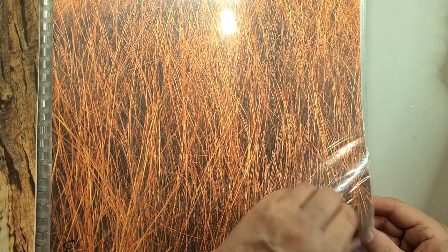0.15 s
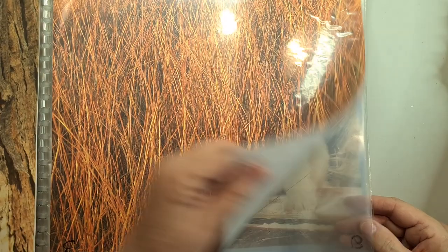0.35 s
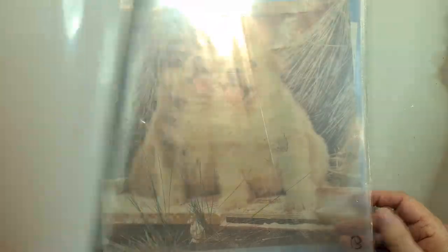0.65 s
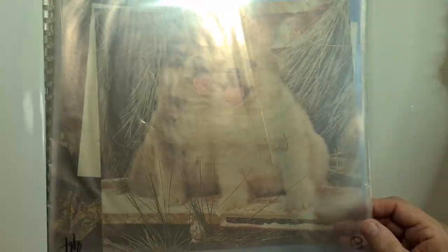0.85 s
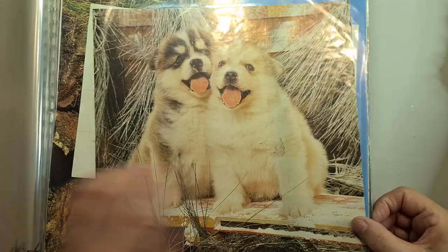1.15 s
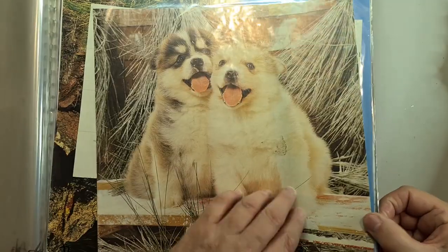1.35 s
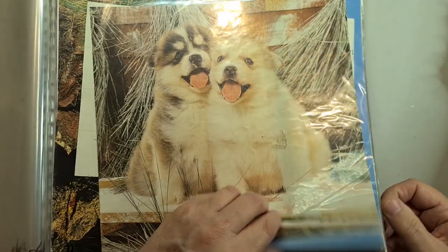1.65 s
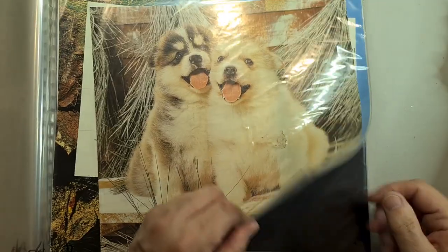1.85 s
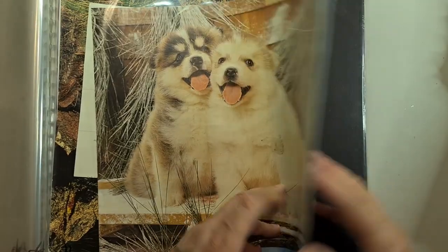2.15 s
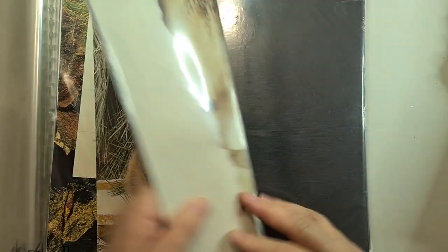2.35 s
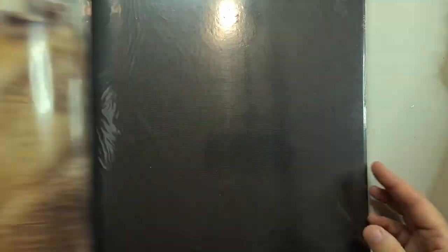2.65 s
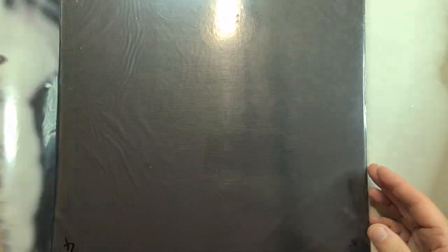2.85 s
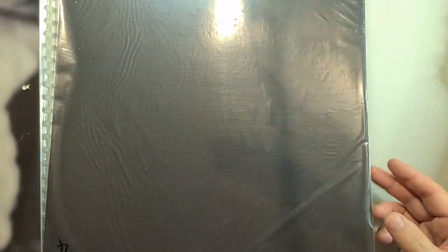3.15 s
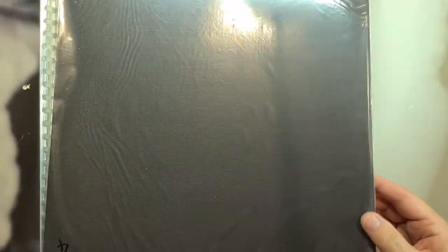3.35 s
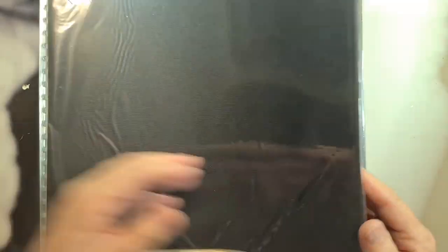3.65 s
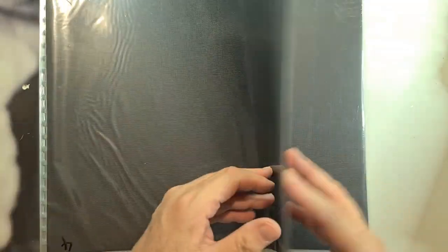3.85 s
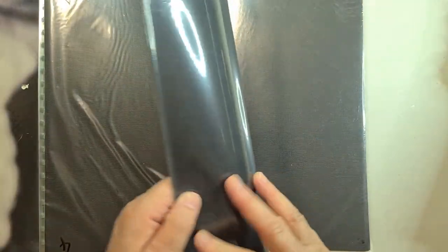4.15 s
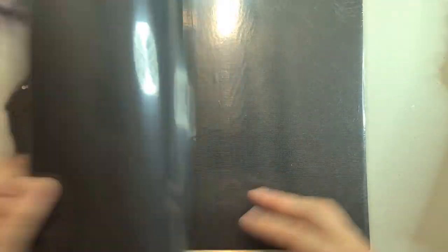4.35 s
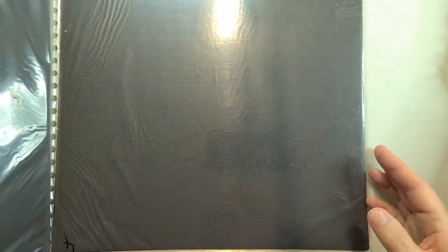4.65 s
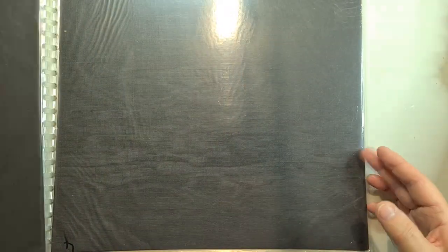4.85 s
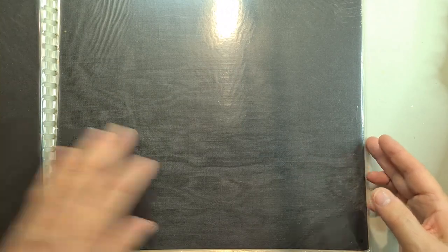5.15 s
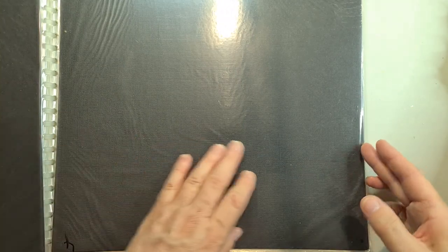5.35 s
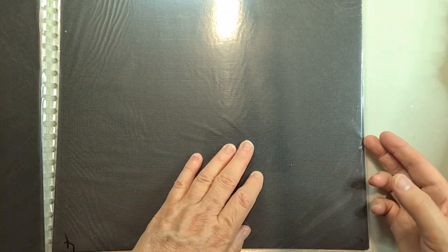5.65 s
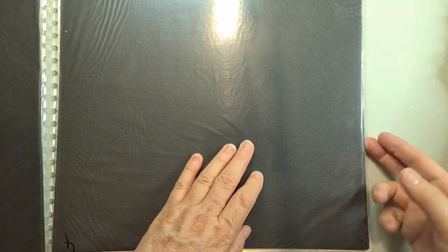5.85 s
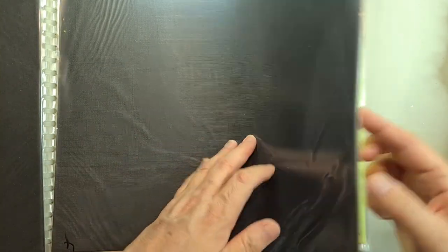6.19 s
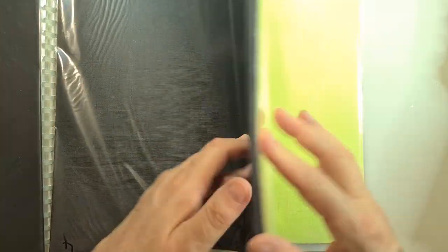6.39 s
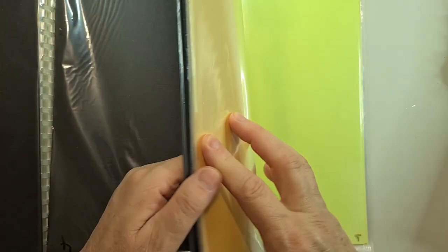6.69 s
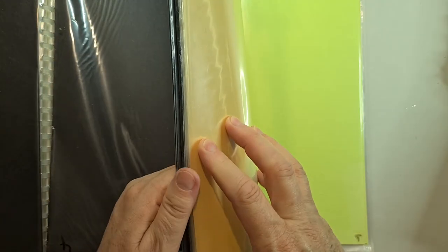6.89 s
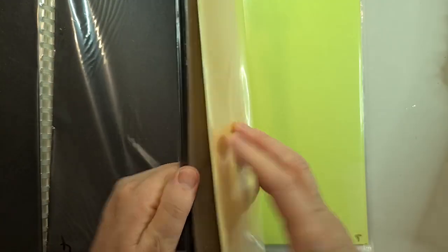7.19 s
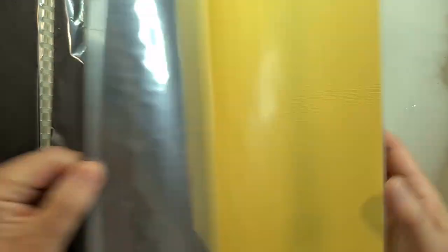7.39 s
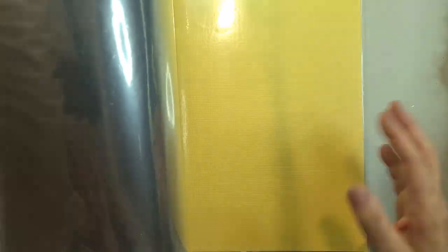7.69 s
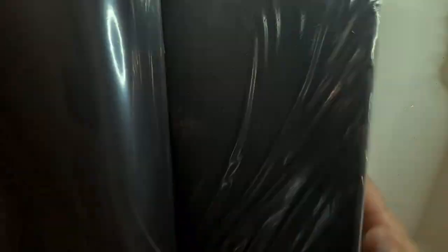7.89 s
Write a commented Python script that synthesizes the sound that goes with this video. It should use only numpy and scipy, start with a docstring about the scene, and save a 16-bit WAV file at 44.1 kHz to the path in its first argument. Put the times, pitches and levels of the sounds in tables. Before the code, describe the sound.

Large plastic sleeve pages crinkle, snap and pop as hands turn them close up, over a low appliance hum, ending in a hard booming slap.

```python
"""A small room with an appliance humming; a table, close under a stereo phone microphone.
Hands leaf through a big folder of plastic sleeves: bending film rustles in showers of tiny noise bursts
and cracks in short pitched ticks; stiffer sheets pop as pulses with ringing modes.
Pages thump down as damped low swings, fingers rub a sleeve as resonant hiss,
and late on the lifted stack slaps taut with a gliding boom. A short diffuse tail follows the hands."""
import sys
import numpy as np
from scipy import signal
from scipy.fft import rfft, irfft, next_fast_len
from scipy.io import wavfile
from scipy.ndimage import uniform_filter1d

SR = 44100
rng = np.random.default_rng(int(sys.argv[2]) if len(sys.argv) > 2 else 0)


def int16_out(signal):
    """Quantize to a 16-bit WAV file."""
    q = np.round(np.clip(np.atleast_2d(signal).T, -1, 1) * 32767)
    wavfile.write(sys.argv[1], SR, q.astype(np.int16))


N = 353946
SIDES = np.array([[.5], [-.5]])  # left and right microphone port: shares of a left-minus-right value


def undb(db):
    """Amplitude factor of a level in dB."""
    return 10 ** (np.asarray(db) / 20)


def level(x, db):
    """Bring a sound to an RMS level, which may vary with time."""
    return x * undb(db) / np.sqrt(np.mean(x ** 2))


def colour(x, points):
    """Shape a spectrum by (pitch_hz, level_db) points, joined along log frequency."""
    hz, db = np.transpose(points)
    size = next_fast_len(x.shape[-1])
    f = np.arange(size // 2 + 1) * SR / size + 1
    gain = undb(np.interp(np.log(f), np.log(hz), db))
    return irfft(rfft(x, size) * gain, size)[..., :x.shape[-1]]


def band(x, hz, width):
    """Two-pole resonance, gain 1 at the centre."""
    b, a = signal.iirpeak(min(hz, SR * .45), hz / min(width, SR / 4), SR)
    return signal.lfilter(b, a, x)


def pair(size, alike):
    """Noise for both ports; alike 0-1 is their correlation."""
    mid, side = rng.standard_normal((2, size))
    alike = np.clip(alike, 0, 1)
    return np.sqrt((1 + alike) / 2) * mid + np.sqrt((1 - alike) / 2) * side * np.sign(SIDES)


def fade(t60, size):
    """Exponential decay by 60 dB in t60 seconds, never quicker than 2 ms."""
    return np.exp(-np.log(1000) * np.arange(size) / SR / max(t60, .002))


def walk(rate):
    """Random wander: a new value every 1 / rate s, slewed between; spread about 0.8."""
    k = int(SR / rate)
    held = np.repeat(rng.standard_normal(N // k + 1), k)
    return uniform_filter1d(held, k)[:N]


def curve(table):
    """Columns of a table, after its times, as values at every sample."""
    s, *columns = np.transpose(table)
    return [np.interp(np.arange(N) / SR, s, c) for c in columns]


def add(out, s, x, peak_db, pan_db):
    """Lay a short sound at time s, its port average peaking at peak_db, leaned left by pan_db."""
    i = int(s * SR)
    x = x[:, :N - i] / np.abs(x.mean(axis=0)).max()
    out[:, i:i + x.shape[1]] += x * undb(peak_db + pan_db * SIDES)


# appliance hum lines: pitch_hz, width_hz (of each of two filter passes), level_db
HUM_LINES = [(50.4, 7.2, -64), (102.9, 12.8, -58.5), (150.1, 9.2, -59.5), (204.7, 19.4, -54),
             (232, 19.7, -54.5), (297.9, 16.6, -66), (343.4, 25, -76)]
# spectrum of rumble and hiss behind the hum: pitch_hz, level_db (per Hz, relative)
AIR_SPECTRUM = [(15, -39), (25, -21), (53, -2.5), (149, -5.5), (206, -6), (293, -10), (344, -16.5),
                (575, -32.5), (887, -27.5), (2220, -48.5), (7310, -58), (12900, -50), (16000, -61)]
AIR_DB = -53.5


def hum():
    """Noisy motor lines over rumble, and faint unrelated hiss at each port."""
    drone = pair(N, 0.99)
    lines = 0
    for hz, width, db in HUM_LINES:
        line = band(band(drone, hz, width), hz, width)
        lines = lines + level(line, db + 1.83 * walk(1.584))
    low = signal.butter(2, 450., fs=SR, output="sos")
    near, apart = pair(N, 0.98), pair(N, 0)
    # the ports nearly agree at low pitch and differ above
    air = signal.sosfilt(low, near - apart) + apart
    return lines + level(colour(air, AIR_SPECTRUM), AIR_DB)


def grains(rate, spread_db, t60, hiss_db, alike):
    """Tiny creases at random moments (rate per second), each a short burst, over sliding hiss."""
    strength_db = spread_db * np.minimum(rng.exponential(size=N), 4)
    hit = (rng.random(N) < rate / SR) * undb(strength_db)
    power = signal.fftconvolve(hit ** 2, fade(t60, 2048) ** 2)[:N]
    shape = np.sqrt(power.clip(0))
    return (level(shape, 0) + undb(hiss_db)) * pair(N, alike)


def creases(centres_hz, rate, t60, alike):
    """Each size of crease snaps at its own moments and rings its own band."""
    total = 0
    for hz in centres_hz:
        snaps = grains(rate, spread_db=4.5, t60=t60, hiss_db=-2.5, alike=alike)
        total = total + band(snaps, hz, 0.64 * hz) / np.sqrt(hz)
    return total


# hands stirring the film, level of the fine rustle: start_s, level_db
STIRRING = [(0.0, -73), (0.67, -75.5), (1.34, -80), (2.01, -67), (2.68, -68.5), (3.35, -70.5), (4.01, -73),
            (4.68, -61), (5.35, -99.0), (6.02, -74.5), (6.95, -86), (7.36, -72), (8.03, -61.5)]
STIR_CRINKLE_DB, STIR_FLAP_DB = -0.5, -3  # lower layers against the finest
# tugs at a page: start_s (full level reached), held_s, fine_db, crinkle_db, flap_db
PAGE_TUGS = [(0.068, 0.085, -64, -62, -70), (0.199, 0.066, -64.5, -63.5, -70.5),
             (0.376, 0.011, -73, -53.5, -55.5), (0.493, 0.067, -68, -60.5, -67.5),
             (0.598, 0.041, -65.5, -61.5, -64), (0.713, 0.025, -80, -65, -65.5),
             (0.827, 0.089, -60.5, -61, -61), (0.966, 0.0092, -61.5, -58, -67),
             (1.129, 0.0065, -62, -59.5, -68), (1.356, 0.098, -78, -71, -73), (1.465, 0.158, -90, -81, -67),
             (1.628, 0.0045, -54, -49, -55.5), (1.688, 0.006, -58, -56, -63), (1.78, 0.046, -70, -65, -65),
             (1.943, 0.086, -61, -59.5, -58), (2.088, 0.063, -61, -59.5, -68),
             (2.193, 0.079, -61, -64, -62.5), (2.328, 0.035, -58.5, -66.5, -85.0),
             (2.437, 0.018, -59, -60, -66), (2.602, 0.016, -56, -67.5, -71),
             (2.668, 0.023, -64, -64, -57.5), (2.79, 0.037, -68.5, -76, -56),
             (2.906, 0.043, -50, -52.0, -53.5), (3.26, 0.04, -54, -59, -79), (3.445, 0.034, -66, -71, -76),
             (3.596, 0.044, -58.5, -59, -63.5), (3.742, 0.015, -63, -53, -56),
             (3.828, 0.066, -58.5, -58.5, -67), (3.944, 0.096, -61, -63, -62.5),
             (4.123, 0.14, -65.5, -62.5, -67), (4.27, 0.11, -53.5, -52.5, -54.5),
             (4.404, 0.07, -59, -57.5, -51), (4.588, 0.067, -50, -51, -51.5),
             (4.717, 0.049, -55.5, -62, -60.5), (4.797, 0.048, -54, -57, -60.5),
             (4.958, 0.0065, -53.5, -61, -65), (5.04, 0.01, -65, -71, -78), (5.185, 0.12, -65, -71, -65),
             (5.351, 0.0082, -51.5, -59.5, -53), (5.466, 0.006, -58, -58, -64),
             (5.686, 0.006, -63, -61.5, -69), (6.02, 0.036, -50.5, -46.5, -44),
             (6.093, 0.007, -51.5, -50, -46), (6.184, 0.044, -52.5, -50.5, -52.5),
             (6.291, 0.006, -52.5, -52.5, -57), (6.44, 0.06, -55, -65, -72),
             (6.555, 0.085, -64.5, -66, -70.5), (6.716, 0.023, -65, -68.5, -73),
             (7.012, 0.017, -66, -78.5, -78), (7.142, 0.049, -60.5, -60.5, -63.5),
             (7.243, 0.025, -52.5, -52.5, -57.5), (7.36, 0.058, -53.5, -53, -59),
             (7.48, 0.017, -59, -58.0, -65), (7.685, 0.076, -57.5, -55.5, -62),
             (7.813, 0.023, -43.5, -41.5, -34)]
RISE_DB_PER_S, FALL_DB_PER_S = 798, 314


def tugs():
    """Levels of fine rustle, crinkle and flap: faint stirring plus bursts that swell fast, hold and die."""
    t = np.arange(0, N + 64, 64) / SR
    s, held_s, *peaks_db = np.transpose(PAGE_TUGS)[:, :, None]
    swell_db = RISE_DB_PER_S * np.minimum(t - s, 0)
    shape_db = swell_db - FALL_DB_PER_S * np.maximum(t - s - held_s, 0)
    stir_db = np.interp(t, *np.transpose(STIRRING))
    levels = []
    for peak_db, layer_db in zip(peaks_db, (0, STIR_CRINKLE_DB, STIR_FLAP_DB)):
        power = (undb(shape_db + peak_db) ** 2).sum(axis=0) + undb(stir_db + layer_db) ** 2
        levels.append(np.interp(np.arange(N) / SR, t, 10 * np.log10(power)))
    return levels


# spectrum of thin film: pitch_hz, level_db (per Hz, relative)
FILM_SPECTRUM = [(880, -12.5), (1500, -2), (2100, -2.5), (2590, -1), (3520, -3.5), (6830, -4), (7320, -7.5),
                 (7920, -1.5), (12000, -4), (15100, -5), (16000, -43)]
# spectrum of a whole sheet: pitch_hz, level_db (per Hz, relative)
SHEET_SPECTRUM = [(210, -30), (350, -4), (487, -3), (632, -2), (853, -5), (1280, -10), (1600, -20),
                  (2080, -23), (3520, -120)]
# where the hands work, between the ports: start_s, left_minus_right_db
HAND_PLACES = [(0.0, -2), (0.74, 3.5), (1.65, 1), (3.55, 3.5), (3.98, 0.5), (4.54, 2), (5.16, 0.5),
               (6.62, 0.5), (6.71, 1), (8.03, 2)]


def rustle():
    """Small creases sound high, larger ones lower, whole sheets flap lowest; some snaps reach all bands."""
    fine_db, crinkle_db, flap_db = tugs()
    broad = grains(rate=160.0, spread_db=2.5, t60=0.0062, hiss_db=-1.0, alike=0.051)
    small = level(creases((5900, 8900, 12800, 15100), rate=65.0, t60=0.0096, alike=0.047), 0)
    middle = level(creases((1680, 2560, 3820, 5060), rate=45., t60=0.013, alike=0.12), 0)
    large = level(creases((450, 700, 1100), rate=30., t60=0.022, alike=0.85), 0)
    # fine rustle lies above the split, crinkle below it
    split = signal.butter(3, 5200., fs=SR, output="sos")
    fine = colour(small + 0.52 * broad, FILM_SPECTRUM)
    fine = fine - signal.sosfiltfilt(split, fine)
    crinkle = signal.sosfilt(split, colour(middle + 1.33 * broad, FILM_SPECTRUM))
    flap = colour(large + 1.47 * broad, SHEET_SPECTRUM)
    fine = level(fine, fine_db + 2.0 * walk(37))
    crinkle = level(crinkle, crinkle_db + 1.75 * walk(32))
    flap = level(flap, flap_db + 1.86 * walk(13))
    return (fine + crinkle + flap) * undb(curve(HAND_PLACES)[0] * SIDES)


# creases of the film snapping over: start_s, peak_db, pitch_hz, left_minus_right_db
FILM_CRACKS = [(0.068, -46, 8730, -4), (0.372, -29, 2170, 1), (0.483, -49, 5730, 5), (0.5, -41, 4870, 6),
               (0.746, -51.5, 3390, 8), (0.819, -50, 9000, 2), (1.1202, -32, 9400, -2),
               (1.6286, -30, 3770, -3), (1.686, -37.5, 12100, -2), (1.6965, -32, 12300, -2),
               (1.778, -47, 3340, 6), (1.924, -39, 3700, 0), (1.9877, -40, 3460, -0.5),
               (2.0166, -44, 3500, 0.5), (2.047, -45, 3980, 0), (2.0893, -30, 6500, 6),
               (2.0922, -32, 9000, -4), (2.132, -36, 2300, -3), (2.204, -47, 1900, 2),
               (2.252, -39, 11600, 4), (2.332, -42, 11600, 0), (2.43, -46, 4000, 1), (2.6723, -44, 8400, 7),
               (2.918, -38, 9000, 1), (3.39, -49, 9000, 3), (3.4452, -44.5, 8000, -1),
               (3.4817, -43, 8120, 5), (3.593, -39, 3070, 6), (3.617, -43, 3500, 4),
               (3.736, -35.5, 2200, 1.5), (3.7437, -40, 1800, 2), (3.7594, -35, 2200, 2),
               (3.7953, -42, 8030, -0.5), (3.831, -44, 7000, 3), (3.838, -36.5, 3800, 3),
               (3.856, -43.5, 1700, 2), (4.037, -43.5, 2870, 4), (4.127, -47.5, 6600, 6),
               (4.236, -42, 8850, 2.0), (4.2567, -38, 3800, 5), (4.299, -31, 9200, 5),
               (4.346, -33, 8600, 5), (4.3674, -39, 13600, 1.5), (4.4048, -39, 5800, 9),
               (4.414, -39, 8000, 4), (4.505, -44, 4000, 2), (4.58, -27, 4540, 2), (4.6225, -29, 12000, 7),
               (4.809, -44, 7500, -4), (4.8254, -29, 9200, 7), (4.9504, -32, 10400, -3),
               (5.242, -39, 9850, 1), (5.312, -36.5, 9100, -4), (5.3451, -34.5, 11000, 2),
               (5.462, -34, 4460, 0), (5.682, -35.5, 8600, 0), (5.913, -47.5, 2000, -8),
               (6.009, -41, 3780, -9), (6.017, -32, 3980, -2), (6.0473, -24, 2920, -2),
               (6.0895, -31, 2970, -4), (6.098, -41, 2980, -6), (6.103, -33, 8140, -0.5),
               (6.119, -32.5, 5390, -2.5), (6.146, -38, 5100, -3), (6.202, -36, 3440, -3),
               (6.221, -41, 8000, -2), (6.272, -44, 9000, -2), (6.288, -36, 4500, -3),
               (6.2984, -26.5, 4780, -2), (6.613, -39.5, 11800, 3), (6.717, -40, 9050, 4.5),
               (7.019, -37, 8700, 4), (7.131, -32, 8950, 2), (7.16, -36, 5000, 6), (7.2399, -33, 8720, 7),
               (7.259, -39, 7000, 3), (7.303, -37.5, 8610, 0), (7.319, -45, 7000, 4),
               (7.3547, -33.5, 9000, 2), (7.3818, -31, 3100, 4), (7.432, -42, 1600, 2),
               (7.471, -44, 4500, 2), (7.4955, -39, 3030, 0), (7.657, -48, 4500, 3),
               (7.684, -32.5, 9610, 5), (7.6922, -34.5, 8000, 7), (7.712, -38.5, 1500, 3),
               (7.7542, -35, 4880, 7), (7.8035, -18, 2950, 0), (7.827, -21, 9700, 2),
               (7.8415, -28, 8950, -2), (7.9105, -39.5, 8780, 0), (8.013, -46, 4650, 6)]
# resonances of the taut sleeve when snapped or rubbed: pitch_hz, width_hz (per filter pass), level_db
SLEEVE_MODES = [(1710, 390, -0.5), (3700, 700, -7), (5500, 1100, -4.5), (9640, 2700, 0.5)]


def cracks():
    """Each snap is a sharp tick and brief noise at its own pitch; it rings the sleeve, retuned by each bend."""
    out, t = np.zeros((2, N)), np.arange(2048) / SR
    shape = (fade(0.0076, 2048) + 0.19 * fade(0.034, 2048)) * (1 - fade(0.002, 2048))
    for s, db, hz, pan_db in FILM_CRACKS:
        bend, lag = rng.standard_normal(2)
        # the tick reaches the ports slightly apart
        tick = np.sinc(SR * .7 * (t - .0006 + .00008 * lag * SIDES))
        burst = pair(2048, 0.058) * shape + 2.43 * tick
        narrow = band(burst, hz, 0.19 * hz)
        broad = band(colour(burst, FILM_SPECTRUM), hz, 1.7 * hz)
        ring = 0
        for f, width, mode_db in SLEEVE_MODES:
            # modes far from the snap's pitch are driven less
            gain = undb(mode_db - 3. * abs(np.log2(f / hz)))
            ring = ring + gain * band(burst, f * np.exp(0.071 * bend), width)
        add(out, s, narrow + 0.65 * broad + 0.76 * ring, db, pan_db)
    return out


def flick(hz, cycles, t):
    """A few swings under a bell-shaped envelope."""
    return np.exp(-(t * hz / cycles) ** 2) * np.cos(2 * np.pi * hz * t)


# stiff sheets buckling: start_s, peak_db, pitch_hz, left_minus_right_db
SHEET_POPS = [(0.359, -43, 1690, 4), (0.371, -27, 1390, 4), (1.121, -39.5, 2420, -0.5),
              (1.631, -31.5, 1380, 0), (1.922, -36.5, 796, 0), (1.989, -44, 830, -2),
              (2.133, -37.5, 704, 2), (2.205, -44.5, 700, 2), (2.803, -41, 1300, 4.5), (2.802, -30, 510, 6),
              (3.742, -37.5, 650, 2), (4.328, -36.5, 526, -2), (4.358, -36, 377, -5), (4.376, -39, 530, -4),
              (4.404, -35, 580, -8.5), (4.482, -37.5, 420, -9), (4.602, -43, 543, -11),
              (4.823, -40, 645, 0.5), (5.242, -30.5, 620, -1), (5.348, -33.5, 540, -2),
              (5.46, -46, 547, -2), (5.68, -46, 646, -4), (6.01, -31.5, 750, 0), (6.017, -27, 895, 3),
              (6.046, -23.5, 593, -2.5), (6.0884, -13, 688, -1), (6.175, -34, 407, -2),
              (6.212, -34, 2520, 1), (6.244, -40, 1500, -2), (6.299, -35.5, 546, -2.5),
              (7.16, -43, 1680, -2), (7.405, -40, 1690, 10), (7.693, -38.5, 416, -5),
              (7.8015, -15, 760, 4.5), (7.994, -38.5, 690, 0.5)]
# ringing modes of a page: pitch_hz, level_db, t60_s
PAGE_MODES = [(341, -3.5, 0.062), (441, -5, 0.11), (532, -1, 0.049), (695, -1, 0.045), (820, -15, 0.028),
              (1096, -21, 0.056), (1460, -7, 0.037), (1753, -7, 0.045)]
RING_DB, EDGE_DB = -10, -9.5  # ringing and bright edge of a pop, against its pulse


def pops():
    """A buckle radiates a blunt pulse with a bright edge, leaves a ragged rattle and rings the page."""
    out, t = np.zeros((2, N)), np.arange(8192) / SR
    for s, db, hz, pan_db in SHEET_POPS:
        # the far port hears the pulse a little later
        late = t - .0026 + .00003 * pan_db * SIDES
        pulse = flick(hz, 0.94, late) + undb(EDGE_DB) * flick(1590.0, 1.3, late)
        rattle = band(band(pair(8192, 0.62), hz, 1.54 * hz), hz, 1.54 * hz) * fade(0.051, 8192)
        # each mode reaches the two ports a little out of step
        turns = rng.random((len(PAGE_MODES), 2)) @ np.array([[0.81, 1.0], [0.06, -0.049]])
        ring = 0
        for (f, mode_db, t60), turn in zip(PAGE_MODES, turns):
            # modes far from the buckle's pitch are driven less
            gain = undb(mode_db - 4.8 * abs(np.log2(f / hz)))
            ring = ring + gain * np.sin(2 * np.pi * (f * t + turn[:, None])) * fade(t60, 8192)
        tail = .5 * rattle / np.abs(rattle).max() + undb(RING_DB) * ring / np.abs(ring).max()
        add(out, s, pulse + tail * (1 - fade(0.0071, 8192)), db, pan_db)
    return out


# pages and hands landing on the stack: start_s, peak_db, pitch_hz, t60_s, left_minus_right_db
LANDINGS = [(0.369, -33, 231, 0.021, 0), (0.89, -38, 57, 0.11, -1), (2.799, -39, 143, 0.1, -2),
            (3.7423, -31, 201, 0.06, -2), (4.357, -30, 80.5, 0.044, -6), (4.479, -31, 109, 0.05, -1),
            (4.579, -40, 110, 0.063, -2), (5.184, -30.5, 92, 0.072, -2), (6.049, -33, 89, 0.12, 0),
            (6.152, -35.5, 94.2, 0.1, -1), (7.811, -28, 76, 0.096, 13), (7.84, -29.5, 151, 0.16, -1)]


def thumps():
    """Soft landings push a damped low swing of the table."""
    out, t = np.zeros((2, N)), np.arange(8192) / SR
    for s, db, hz, t60, pan_db in LANDINGS:
        swing = np.sin(2 * np.pi * hz * t) * fade(t60, 8192) * (1 - fade(0.011, 8192))
        add(out, s, np.array([swing, swing]), db, pan_db)
    return out


# fingers slide down a sleeve, then rest and creep: start_s, level_db, brightness_db_per_octave
FINGER_RUB = [(6.36, -95, -1), (6.41, -63.5, 1.5), (6.47, -58, 4.5), (6.52, -67, 1.5), (6.6, -70, -8),
              (6.8, -75.5, -8), (6.92, -72.5, -12), (7.12, -83, -10)]


def rub():
    """Smooth friction hiss in the sleeve's resonances, its brightness following the table."""
    db, bright_db = curve(FINGER_RUB)
    lowest_hz, noise = SLEEVE_MODES[0][0], pair(N, 0.15)
    total = 0
    for hz, width, mode_db in SLEEVE_MODES:
        hiss = level(band(band(noise, hz, width), hz, width), 0)
        total = total + hiss * undb(db + mode_db + bright_db * np.log2(hz / lowest_hz))
    return total


# the lifted stack slaps taut and booms: its pitch climbs, then sags
SLAP_S, SLAP_DB, SLACK_HZ, TAUT_HZ = 7.801, -15, 390, 702
CLIMB_S, SAG_HZ_PER_S = 0.0149, 4430
HOLD_S = 0.035  # length of the sag after the climb; also time from the slap to the quick decay
DROOP_DB_PER_S, SLAP_T60_S = 150, 0.043  # steady droop throughout, quick decay added after the hold


def slap():
    """One sheet mode whose pitch climbs with tension, then sags; louder at the left port."""
    t = np.maximum(np.arange(N) / SR - SLAP_S, 0)
    climb_hz = (TAUT_HZ - SLACK_HZ) * np.minimum(t / CLIMB_S, 1)
    sag_hz = SAG_HZ_PER_S * np.clip(t - CLIMB_S, 0, HOLD_S)
    hz = SLACK_HZ + climb_hz - sag_hz
    db = SLAP_DB - DROOP_DB_PER_S * t - 60 * np.maximum(t - HOLD_S, 0) / SLAP_T60_S
    turns = np.cumsum(hz * (1 + 0.079 * walk(200)) * (t > 0)) / SR
    swing = np.sin(2 * np.pi * turns + .5 * SIDES)
    return (t > 0) * swing * undb(db + 2.1 * walk(150) + 2.5 * SIDES)


ROOM_T60_S, ROOM_DB = .22, -12


def room(x):
    """Diffuse tail, duller as it fades, unlike at each port."""
    noise = pair(16384, 0.2)
    dull = band(noise, 560.0, 4200.0)
    tail = dull * fade(ROOM_T60_S, 16384) + 0.8 * noise * fade(0.061, 16384)
    tail = tail / np.sqrt((tail ** 2).sum(axis=1, keepdims=True))
    source = x.mean(axis=0, keepdims=True)
    return undb(ROOM_DB) * signal.fftconvolve(source, tail)[:, :N]


def scene():
    """The hands' sounds, their tail in the room, and the hum."""
    hands = rustle() + rub() + cracks() + pops() + slap() + thumps()
    return hands + room(hands) + hum()


TOP_HZ = 15900


def record(dry):
    """A steep low-pass at TOP_HZ ends the treble."""
    return signal.sosfilt(signal.ellip(10, .2, 70, TOP_HZ, fs=SR, output="sos"), dry)


dry = scene()
out = record(dry)
int16_out(out)
```